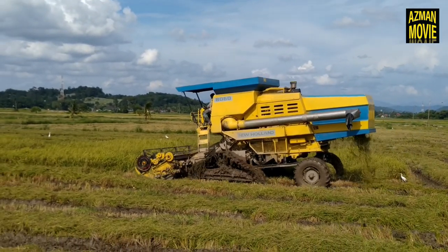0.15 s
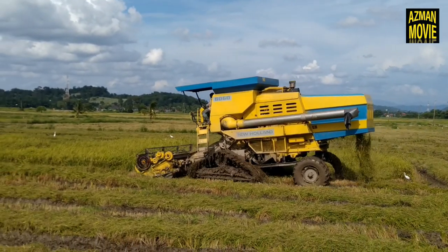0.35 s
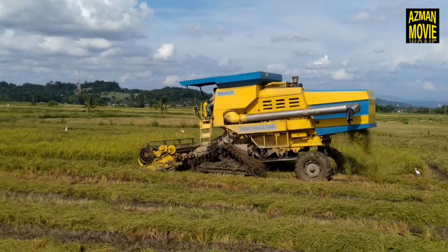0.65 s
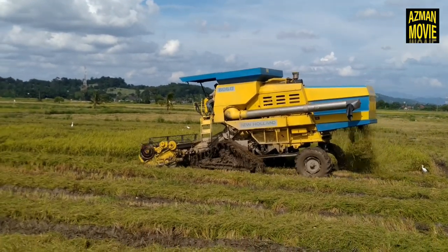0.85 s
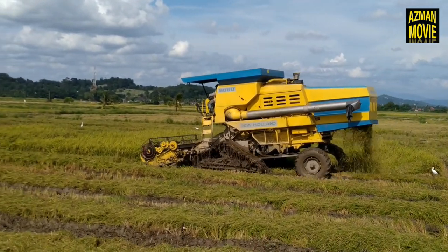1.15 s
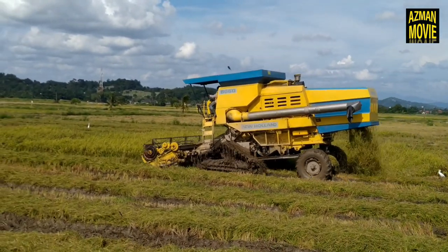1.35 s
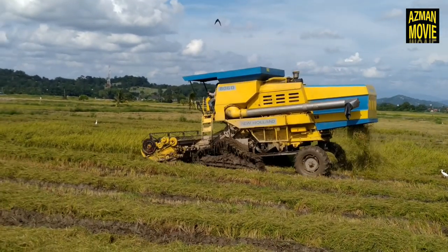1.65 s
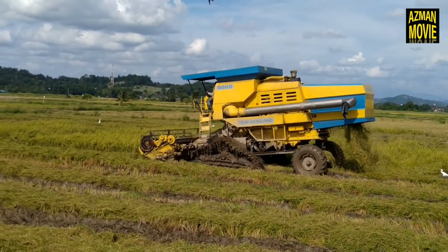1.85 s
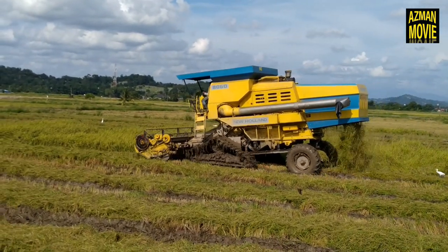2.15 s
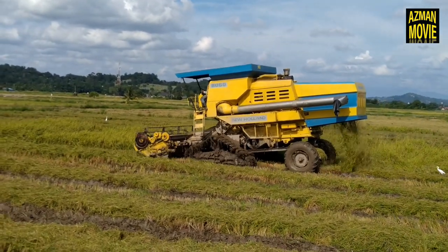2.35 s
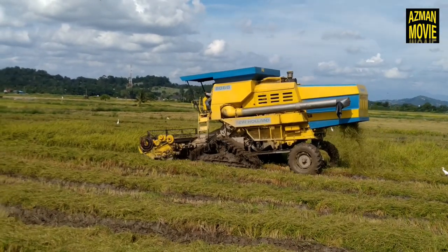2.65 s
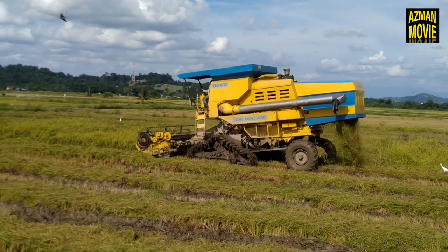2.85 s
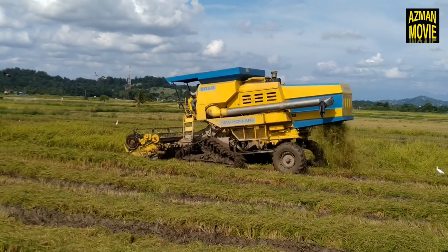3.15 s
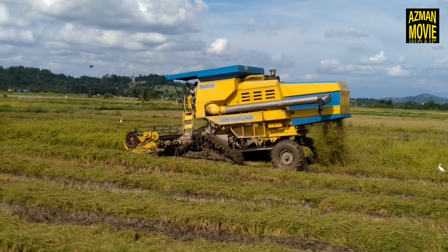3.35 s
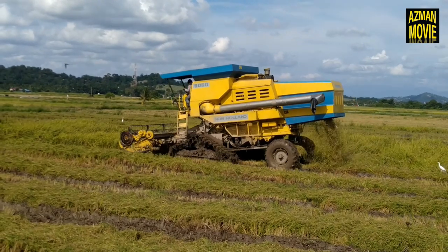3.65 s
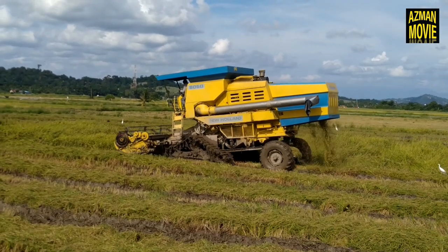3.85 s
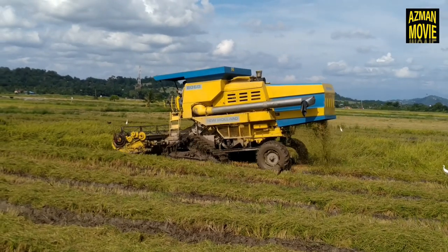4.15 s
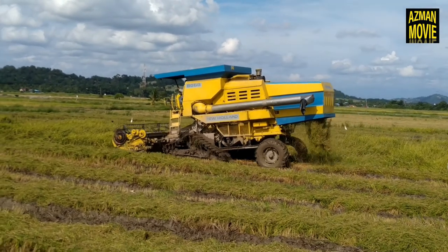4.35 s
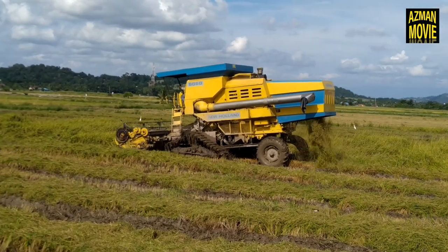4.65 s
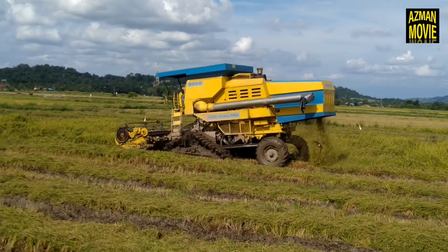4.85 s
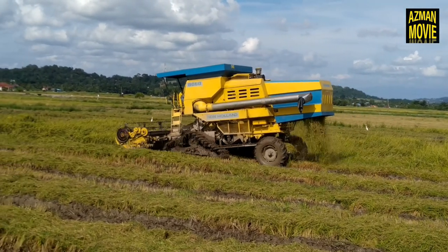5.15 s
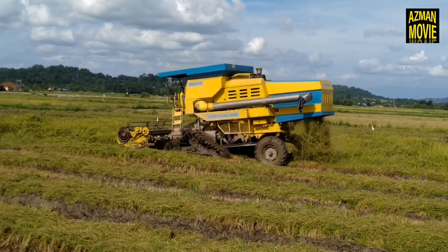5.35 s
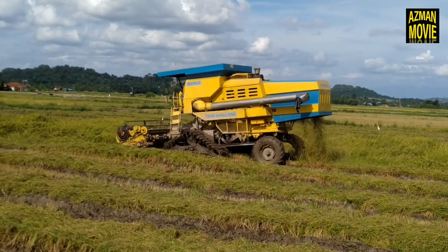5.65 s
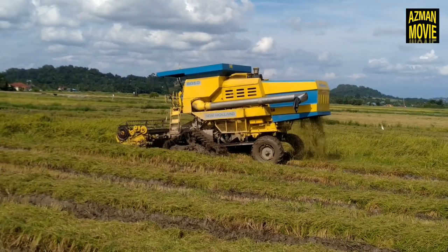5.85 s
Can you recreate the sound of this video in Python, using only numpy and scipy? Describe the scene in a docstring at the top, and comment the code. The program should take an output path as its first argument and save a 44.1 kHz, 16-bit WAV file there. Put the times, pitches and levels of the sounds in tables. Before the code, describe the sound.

Steady low diesel hum with fast clattering knocks and a rushing, crackling spray of cut straw, outdoors with faint wind rumble.

```python
"""A diesel hum, rattling knocks, droning shafts and sprayed straw: a combine harvester cuts rice in an open field.
One crank phase drives the engine orders, the knock bursts with their ringing bands, the injector ticks and the shafts.
Shaped noise makes the threshing rush and the snapping straw, thrown in wads; both follow the crop feed.
A light breeze rumbles at the microphone."""
import sys
import numpy as np
from scipy import signal
from scipy.fft import rfft, irfft
from scipy.io import wavfile

SR = 44100
rng = np.random.default_rng(int(sys.argv[2]) if len(sys.argv) > 2 else 0)


def dump(signal):
    """Clip the signal to [-1, 1] and save it as 16-bit WAV at the path in sys.argv[1]."""
    limited = np.clip(np.atleast_2d(signal).T, -1, 1)
    pcm = np.round(limited * 32767).astype(np.int16)
    wavfile.write(sys.argv[1], SR, pcm)


N = 264600
TIME = np.arange(N) / SR
BIN_HZ = np.maximum(np.arange(N // 2 + 1) * SR / N, 1)

# knock of each cylinder in firing order: (place in the cycle [0-1], relative level [dB])
CYLINDER_KNOCKS = [(.11, -0.5), (.29, 0), (0.452, 3.5), (.63, -1), (0.782, 4.5), (.94, -6.5)]


def from_db(db):
    """Decibels to amplitude gain."""
    return 10 ** (np.asarray(db) / 20)


def rms_one(x):
    """Scale to an rms of 1."""
    return x / np.sqrt(np.mean(x ** 2) + 1e-20)


def in_time(rows):
    """Each column of a curve, interpolated at every sample."""
    s, *columns = np.transpose(rows)
    return [np.interp(TIME, s, c) for c in columns]


def in_frequency(rows):
    """Each column of a spectrum, interpolated over log frequency at every bin."""
    hz, *columns = np.transpose(rows)
    return [np.interp(np.log(BIN_HZ), np.log(hz), c) for c in columns]


def colour(x, spectrum):
    """Give a sound a smooth spectrum; rms 1."""
    gain = from_db(in_frequency(spectrum)[0])
    return rms_one(irfft(rfft(x) * gain, N))


def drift(rate_hz):
    """Low-passed noise with an rms of 1: chance variation up to about rate_hz."""
    lowpass = 1 + (BIN_HZ / rate_hz) ** 2
    return rms_one(irfft(rfft(rng.standard_normal(N)) / lowpass, N))


def swells(rows):
    """Each event is a bell-shaped rise in level; their sum in dB."""
    return sum(db * np.exp(-(2 * (TIME - s) / length_s) ** 2) for s, length_s, db in rows)


def at_ports(direct, scattered):
    """Direct sound reaches both microphone ports alike, sound scattered by the field does not."""
    # two ports: (frequency [Hz], likeness [0-1], left lead [rad], left over right [dB])
    port_rows = [(200, 0.99, -0.1, 1.6), (550, 0.96, -0.1, -0.6), (1050, 0.87, 0.0, -1.6),
                 (1300, 0.82, 0.5, -4.6), (1550, 0.52, 1.3, -1.3), (1800, 0.73, 1.3, 1.6),
                 (2050, 0.52, -0.4, 4.0), (2280, 0.82, 0.1, -0.6), (2550, 0.53, 0.9, 0.5),
                 (3000, 0.59, 0.7, 0.8), (3650, 0.57, 0.8, -0.2), (4800, 0.27, 1.3, 1.8),
                 (6500, 0.12, 1.7, 0.1), (11000, 0.22, 3.4, 2.6)]
    likeness, lead_rad, balance_db = in_frequency(port_rows)
    likeness = np.clip(likeness, 0, 1)
    sides = np.array([[1], [-1]])
    common = np.sqrt((1 + likeness) / 2) * rfft(direct)
    opposed = np.sqrt((1 - likeness) / 2) * rfft(scattered)
    port_response = np.exp(.5j * sides * lead_rad) * from_db(sides * balance_db / 2)
    return irfft((common + sides * opposed) * port_response, N)


def breeze(level_db=1.15, apart_db=-4.0, lumps_db=2.0, lumps_hz=6.1, pan_db=-3.0):
    """Low rumble of moving air: a shared part plus a part of opposite sign at the two ports."""
    # rumble spectrum: (frequency [Hz], density [dB per Hz])
    wind_spectrum = [(20, -37), (33, -28), (45, -2), (62, -3), (85, 0.5), (115, 0), (160, -9.5),
                     (300, -14.5), (800, -52)]
    # breeze before the overall level_db: (time [s], level [dB])
    breeze_curve = [(0, -35), (1.5, -33), (2.1, -44.5), (3.8, -38), (4.7, -30), (6, -33.5)]
    # gusts: (peak time [s], length [s], rise above the breeze [dB])
    gust_rows = [(5.2, 0.31, 5.5), (5.7, .07, 6.5), (5.96, 0.13, 4)]
    shared, own = colour(rng.standard_normal((2, N)), wind_spectrum)
    rumble = shared + from_db(apart_db) * own * [[1], [-1]]
    panned = rumble * from_db([[pan_db / 2], [-pan_db / 2]])
    rise_db = in_time(breeze_curve)[0] + swells(gust_rows)
    return panned * from_db(rise_db + level_db + lumps_db * drift(lumps_hz))


def straw(feed_db, level_db=-47.5, chaff_db=3.5, stalks_db=0.5, grain_db=1.5, clump_db=1.97, flutter_db=1.0):
    """Countless stalks snap and fine chaff hisses, leaving the machine in small clumps and now and then a wad."""
    # spectra: (frequency [Hz], density [dB per Hz])
    stalk_spectrum = [(1000, -12), (3500, 4), (5000, -0.5), (7000, -2.5), (9000, -5), (16000, -28)]
    chaff_spectrum = [(3000, -22), (7000, -7.5), (9000, -3.5), (11200, 4), (13500, -2), (16000, -6.5)]
    # extra share of coarse stalks: (time [s], level [dB])
    stalk_share = [(0, -1), (1, 0), (1.7, -3), (2.4, -5.5), (2.9, 6), (4.2, 0.5), (6, 3.5)]
    # wads thrown from the rear: (peak time [s], length [s], rise above the spray [dB])
    wad_rows = [(.15, .04, 5), (.47, 0.043, 4.5), (.6, .09, 3), (.77, .06, 6), (.94, 0.079, 4.5),
                (1.25, 0.041, 8.5), (1.52, 0.077, 4.5), (1.65, 0.089, 4), (2.0, .05, 4), (2.18, .05, 4),
                (2.54, .05, 4), (3.35, .03, 0), (4.11, 0.086, 6), (4.32, 0.057, 4.5), (4.87, .05, 3.5),
                (5.05, 0.082, 4), (5.46, .05, 3.5)]
    snaps = rng.standard_normal((2, 2, N)) * from_db(grain_db * drift(960))
    stalk_level_db = stalks_db + in_time(stalk_share)[0] + clump_db * drift(23)
    stalks = colour(snaps[0], stalk_spectrum) * from_db(stalk_level_db)
    chaff = colour(snaps[1], chaff_spectrum) * from_db(chaff_db + clump_db * drift(25))
    spray_db = level_db + feed_db + swells(wad_rows) + flutter_db * drift(11)
    return (stalks + chaff) * from_db(spray_db)


def thresher(feed_db, level_db=-29.5, feed_share=0.57):
    """Drum, sieves and fan rush louder as more crop passes through."""
    # rush spectrum: (frequency [Hz], density [dB per Hz])
    rush_spectrum = [(30, -42), (110, 6.5), (160, 3), (250, 8), (380, 4.5), (440, -1.5), (650, -1.5),
                     (860, -1), (1050, -4), (1600, -12), (3000, -12), (4500, -25.5), (8000, -29.5)]
    rush = colour(rng.standard_normal((2, N)), rush_spectrum)
    return rush * from_db(level_db + feed_share * feed_db)


def shafts(cycles, governed_cycles_per_s=21.92, waver_db=2.5, slip_turns=0.097):
    """Belts turn drum, fans and chopper in step with the engine, slipping a little; their hums beat with its notes."""
    # shaft hums: (frequency at governed speed [Hz], mean level [dB])
    shaft_rows = [(73.3, -40.5), (79.2, -40), (172.3, -45.5), (201.5, -41), (279.3, -47), (360, -45),
                  (577, -48)]
    engine_s = cycles / governed_cycles_per_s  # time as told by the crank
    out = 0
    for hz, db in shaft_rows:
        turns = hz * engine_s + slip_turns * drift(0.42) + rng.random()
        out = out + from_db(db + waver_db * drift(2)) * np.sin(2 * np.pi * turns)
    return np.sqrt(2) * out


def injectors(cycles, level_db=-51.0, weaker_db=-1.0, decay_firings=.22):
    """A crisp tick at six even firings per cycle, every other one a little weaker."""
    # tick spectrum: (frequency [Hz], density [dB per Hz])
    tick_spectrum = [(2000, -20), (4000, -7), (7000, -12), (11500, 7), (16000, -7)]
    firing, age = np.divmod(6 * (cycles - CYLINDER_KNOCKS[0][0]), 1)
    strength = from_db(weaker_db * (firing % 2 == 1))
    ticks = rms_one(strength * np.exp(-age / decay_firings))
    return from_db(level_db) * colour(rng.standard_normal((2, N)) * ticks, tick_spectrum)


def firing_bursts(cycles, decay_cycles=0.048, rise_cycles=0.028, uneven_db=2.0, floor_power=.12):
    """Each cylinder gives a short burst once a cycle, its strength varying by chance; powers add."""
    power = floor_power
    for place, db in CYLINDER_KNOCKS:
        turn, age = np.divmod(cycles - place + 1, 1)
        strength = from_db(db + uneven_db * rng.standard_normal(256))[turn.astype(int)]
        shape = (1 - np.exp(-age / rise_cycles)) * np.exp(-age / decay_cycles) * 2
        power = power + (strength * shape) ** 2
    return rms_one(np.sqrt(power))


def resonate(bursts, cycles, modes, repeat=0.4, travel_s=0.004, flare_db=1.55):
    """Each band rings on its own, a little after the knock; part of its rattle repeats with every cycle."""
    size = 2048  # rattle samples per cycle
    crank = (cycles % 1 * size).astype(int)
    loose = rng.standard_normal((2, N))
    out = 0
    for hz, width_hz, db in modes:
        repeated = rng.standard_normal((2, size))[:, crank]
        fresh = np.roll(loose, rng.integers(N), axis=1)
        rattle = np.sqrt(repeat) * repeated + np.sqrt(1 - repeat) * fresh
        delayed = np.roll(bursts, round(rng.random() * travel_s * SR))
        drive = rattle * delayed * from_db(flare_db * drift(15))
        # two resonances in a row give steep skirts; each is wider, as the pair narrows the peak
        r = np.exp(-np.pi * width_hz * 1.5 / SR)
        section = [1 - r, 0, r - 1, 1, -2 * r * np.cos(2 * np.pi * hz / SR), r * r]
        ringing = rms_one(signal.sosfilt([section, section], drive))
        out = out + from_db(db) * np.sqrt(width_hz) * ringing
    return rms_one(out)


def knock(cycles, bands_db=0.68, block_db=-6.0):
    """Combustion and valve gear shake block and panels; the ringing bands of the knock shift as the machine
    passes, probably through moving ground reflections."""
    # ringing bands: (frequency [Hz], width [Hz], density [dB per Hz of width])
    early_modes = [(780, 41, 1), (1124, 66, 4.5), (1353, 74, 3.5), (1622, 123, 0), (1842, 45, 2.5),
                   (2273, 250, -3.5), (3630, 260, -8.5), (4930, 240, -21)]
    middle_modes = [(875, 116, 3), (1180, 98, -0.5), (1400, 65, 6.5), (1673, 200, -1.5), (1946, 53, 0),
                    (2230, 156, -1), (2800, 106, -5.5), (3650, 360, -12.5), (5060, 350, -18)]
    late_modes = [(800, 150, -15), (1230, 89, 2.5), (1433, 120, -4), (1782, 72, 3.8), (2290, 150, -1.5),
                  (3028, 52, -11), (3597, 320, -10), (4980, 180, -18)]
    # crossfade between the sets of bands: (time [s], set [0 early, 1 middle, 2 late])
    band_shift = [(0, -0.5), (.7, -0.04), (1.8, 1.08), (2.7, 0.74), (3.8, 1.64), (4.8, 1.9), (6, 2)]
    # block spectrum: (frequency [Hz], density [dB per Hz])
    block_spectrum = [(250, -11), (500, -2.5), (900, 2.5), (1400, 2.5), (2300, -6), (2700, -11.5),
                      (3700, -10.5), (4400, -17), (7000, -18), (11000, -14.5), (16000, -22)]
    # engine effort, before the band and block gains: (time [s], level [dB])
    effort_curve = [(0, -33.5), (.6, -32.4), (1.6, -32), (2.1, -31.5), (2.8, -32.5), (3.5, -33),
                    (4.4, -33.5), (5.1, -31.5), (6, -32.5)]
    bursts = firing_bursts(cycles)
    position = np.clip(in_time(band_shift)[0], 0, 2)
    bands = 0
    for index, modes in enumerate([early_modes, middle_modes, late_modes]):
        share = np.maximum(1 - abs(position - index), 0)
        bands = bands + np.sqrt(share) * resonate(bursts, cycles, modes)
    block = colour(rng.standard_normal((2, N)) * bursts, block_spectrum)
    shaken = from_db(bands_db) * bands + from_db(block_db) * block
    return from_db(in_time(effort_curve)[0]) * shaken


def exhaust(cycles, firing_db=-0.07, second_db=-.5, waver_db=1.5, main_waver_db=0.5,
            phase_waver_rad=0.009, jitter_rad=0.0051, pan_db=1.5, lag_cycles=.86, smear_turns=.1325):
    """Engine orders: the sixth is the firing note, unequal cylinders fill in the others."""
    # main notes before trim, as the machine passes: (time [s], order 6 level [dB], order 9 level [dB])
    hum_curve = [(0.1, -24.5, -22.5), (0.34, -26.5, -22.5), (3.24, -19.5, -24), (5.32, -20.5, -26.5),
                 (5.85, -20, -25)]
    # lesser orders before the common shift: (multiple of the cycle rate, level [dB])
    order_rows = [(2, -46), (3, -32.5), (4, -41), (8, -37), (10, -28), (11, -43.5), (12, -34.5), (13, -35),
                  (15, -36), (16, -47.5), (17, -39), (18, -46.5), (21, -50), (24, -49), (27, -44),
                  (28, -45), (34, -54.5), (35, -50), (36, -48), (39, -51.5), (41, -49.5), (55, -48.5),
                  (63, -59), (65, -49.5)]
    firing, second = in_time(hum_curve)
    notes = [(6, firing + firing_db + main_waver_db * drift(5)),
             (9, second + second_db + main_waver_db * drift(5))]
    shift_db = 0.81 * (second - second.mean())  # lesser orders follow order 9
    for order, db in order_rows:
        # moving air makes the high orders waver most
        order_waver_db = waver_db * min(order / 10, 2) ** .5 * drift(1.75)
        notes.append((round(order), db + shift_db + order_waver_db))
    # slow wavering and the jerks of uneven firing roughen the high orders
    crank_rad = 2 * np.pi * (cycles - lag_cycles)
    shaken_rad = crank_rad + phase_waver_rad * drift(12.0) + jitter_rad * drift(48)
    out = 0
    for order, level_db in notes:
        # the silencer's phase lag grows with the order squared: a round hum, not a spiky one
        lag_rad = 2 * np.pi * smear_turns * order ** 2
        out = out + from_db(level_db) * np.cos(order * shaken_rad - lag_rad)
    return np.sqrt(2) * out * from_db([[pan_db / 2], [-pan_db / 2]])


def scene():
    """One crankshaft drives exhaust, shafts, knock and injectors; crop noise and breeze lie around them."""
    # governed speed: (time [s], four-stroke cycle rate [cycles/s])
    speed_curve = [(0, 22.06), (0.35, 22.04), (1.3, 21.98), (1.7, 21.78), (2.05, 21.83), (2.4, 22.02),
                   (2.75, 21.9), (3.25, 21.8), (3.55, 21.9), (3.9, 21.81), (4.45, 21.98), (4.95, 21.82),
                   (5.25, 21.9), (5.6, 22.03), (6, 22.0)]
    # crop passing through the machine: (time [s], feed above usual [dB])
    feed_curve = [(0, 0.5), (1.05, 0.5), (1.6, 3.5), (2.15, 3), (2.6, -1), (4.6, -1), (5.0, 1), (5.6, -1),
                  (6, 0.5)]
    cycles = np.cumsum(in_time(speed_curve)[0]) / SR
    feed_db, = in_time(feed_curve)
    direct, scattered = straw(feed_db) + thresher(feed_db) + injectors(cycles) + knock(cycles)
    return breeze() + at_ports(direct, scattered) + shafts(cycles) + exhaust(cycles)


def record(dry, notch_hz=8000, notch_width_hz=3000, leak=0.13, cutoff_hz=15800):
    """The microphone housing cancels a band in the treble, but for a leak; the top is cut steeply."""
    b, a = signal.iirnotch(notch_hz, notch_hz / notch_width_hz, fs=SR)
    notched = signal.lfilter(b, a, dry)
    heard = (1 - leak) * notched + leak * dry
    return irfft(rfft(heard) / np.sqrt(1 + (BIN_HZ / cutoff_hz) ** 400), N)


dry = scene()
out = record(dry)
dump(out)
```